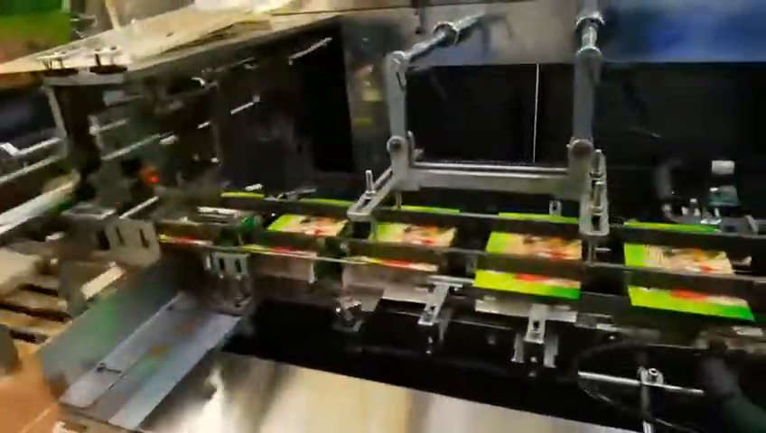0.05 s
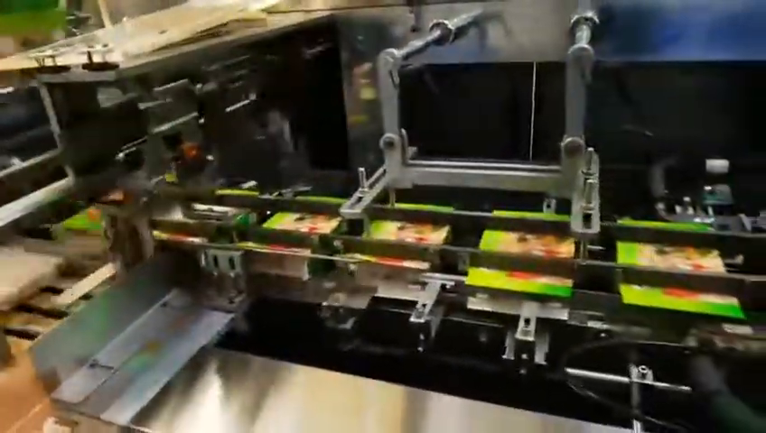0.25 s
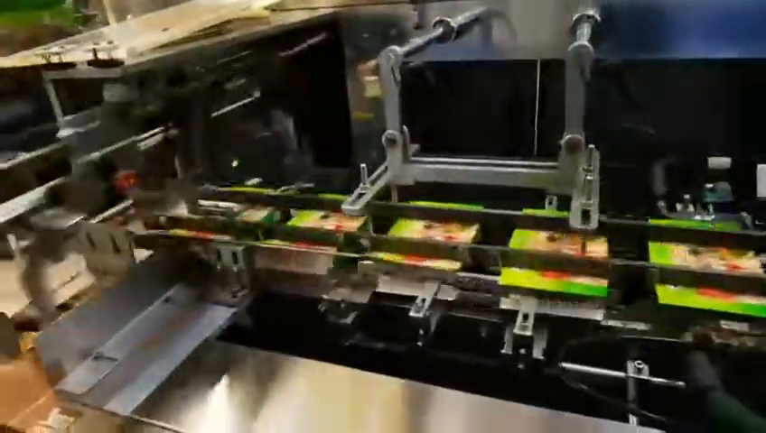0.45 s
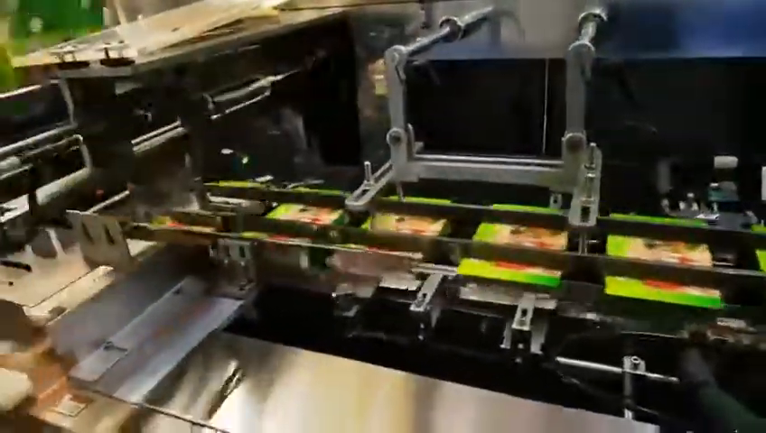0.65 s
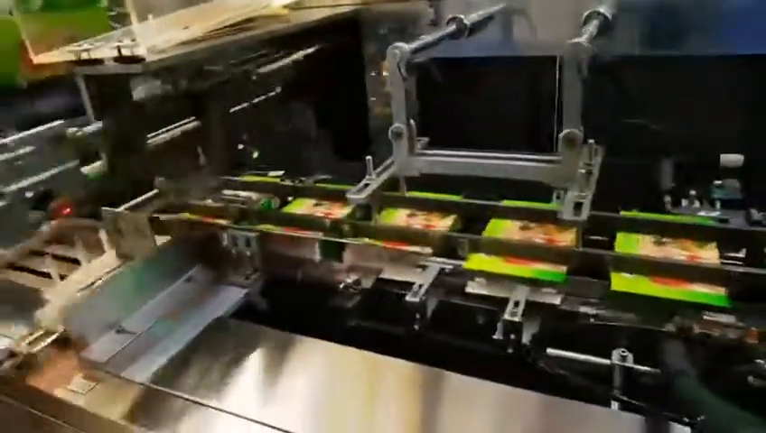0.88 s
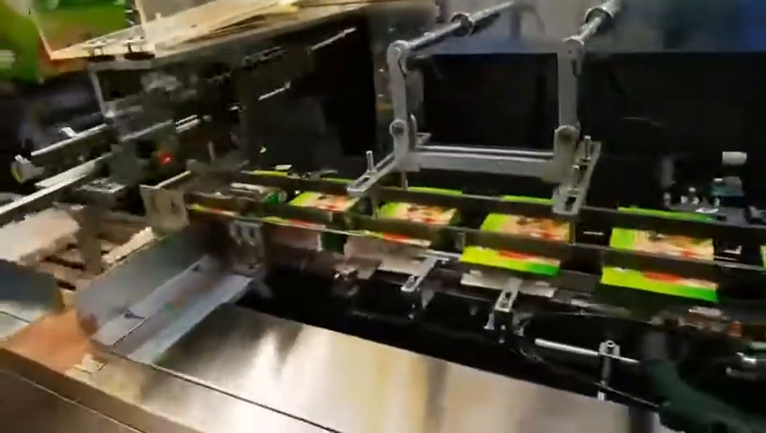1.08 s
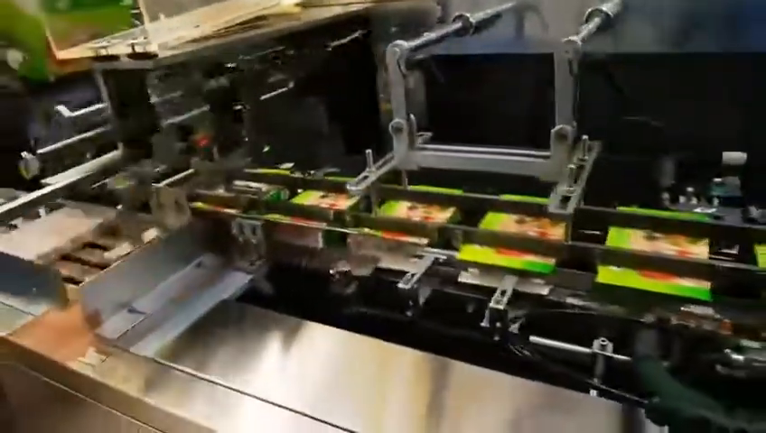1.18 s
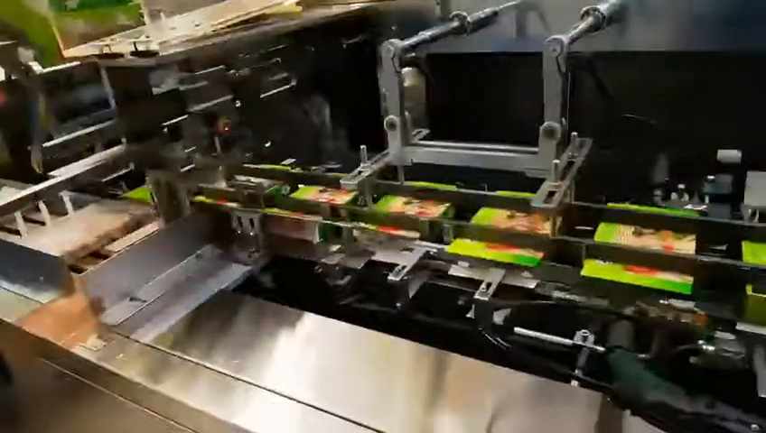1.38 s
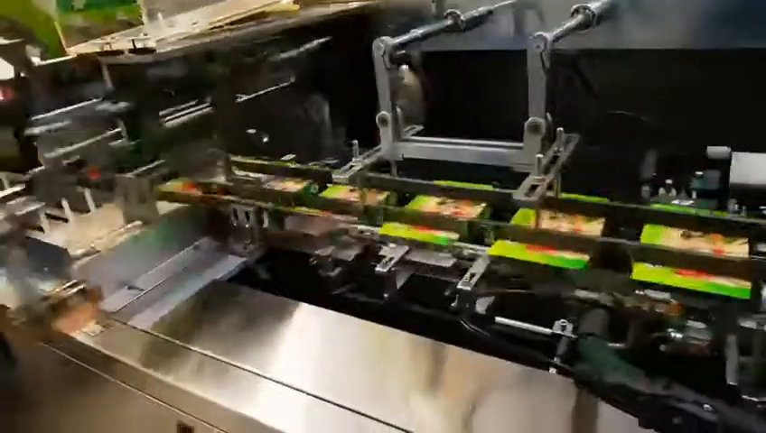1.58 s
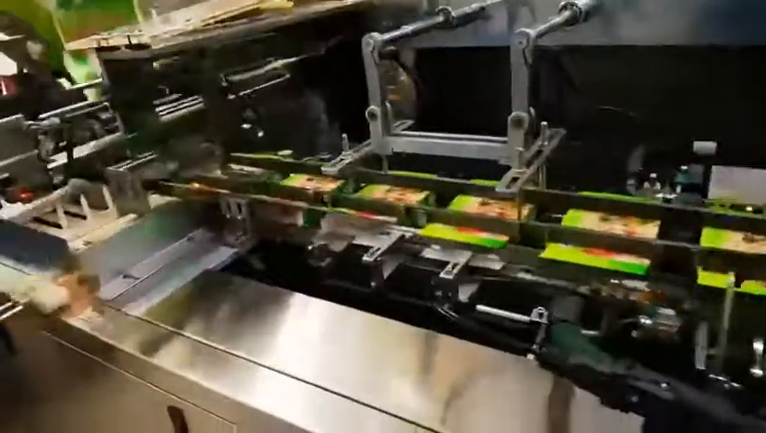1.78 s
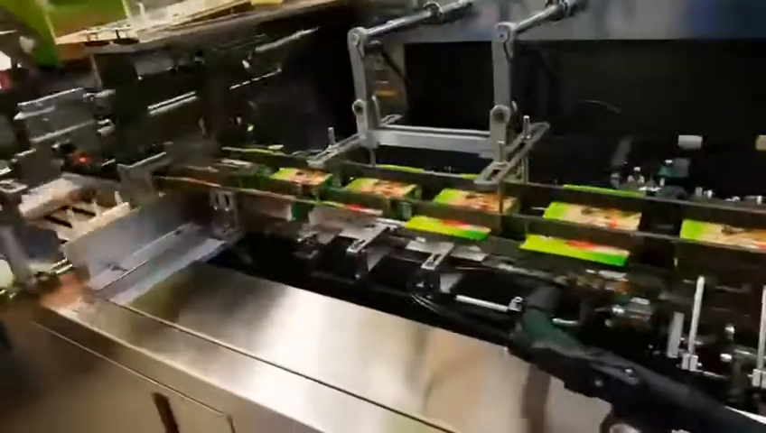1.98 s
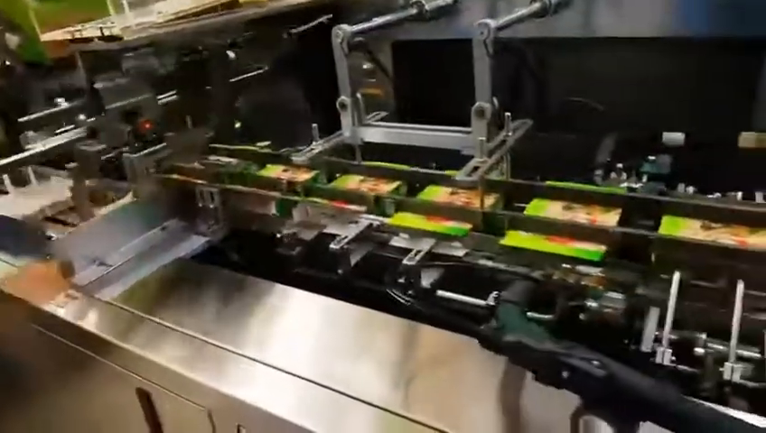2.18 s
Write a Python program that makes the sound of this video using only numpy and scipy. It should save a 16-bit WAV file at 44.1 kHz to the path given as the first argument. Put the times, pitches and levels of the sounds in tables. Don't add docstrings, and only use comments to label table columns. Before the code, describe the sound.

A carton packing machine clatters steadily, with one sharp whistling hiss of vented air near the start

```python
import sys
import numpy as np
from scipy import signal
from scipy.fft import rfft, irfft, next_fast_len
from scipy.io import wavfile
from scipy.ndimage import uniform_filter1d, map_coordinates

SR = 44100
rng = np.random.default_rng(int(sys.argv[2]) if len(sys.argv) > 2 else 0)


def undo_db(level):
    steps = np.asarray(level, float) / 20
    return 10 ** steps


def wav_out(sig):
    wavfile.write(sys.argv[1], SR, np.round(np.clip(np.atleast_2d(sig).T, -1, 1) * 32767).astype(np.int16))


N = 99225


def unit(x):
    return x / np.sqrt(np.mean(x ** 2) + 1e-20)


def along(points, hz):
    f, v = np.transpose(points)
    return np.interp(np.log(hz + 1), np.log(f + 1), v, left=-120)


def curves(rows):
    s, *columns = np.transpose(rows)
    return [np.interp(np.arange(N) / SR, s, c) for c in columns]


def wobble(rate):
    return map_coordinates(rng.standard_normal(400), [np.arange(N) * rate / SR])


def filtered(x, response):
    m = next_fast_len(len(x) + 8192)
    return irfft(rfft(x, m) * response(np.fft.rfftfreq(m, 1 / SR)), m)[:len(x)]


def body(peaks):
    def response(f):
        total = 0
        for k, (hz, width, db) in enumerate(peaks):
            loss = 1j * f * width
            total = total + (-1) ** k * undo_db(db) * loss / (hz * hz - f * f + loss)
        return total
    return response


def rush(tone, patchy_db, shape=lambda hz, t: 0):
    hz, t, z = signal.stft(rng.standard_normal(N), SR, nperseg=512)
    patches = uniform_filter1d(rng.standard_normal(z.shape), size=6, axis=0)
    patches = uniform_filter1d(patches, size=8, axis=1)
    z = z * undo_db(patchy_db * unit(patches) + shape(hz[:, None], t))
    x = signal.istft(z, nperseg=512)[1][:N]
    return filtered(x, lambda f: undo_db(along(tone, f)))


def hits(rows, broad, q, rise_s, snap_db):
    out, t = np.zeros(N + SR), np.arange(SR // 5) / SR
    for s, db, hz, t60, broad_db in rows:
        a, b = rng.standard_normal((2, len(t)))
        fade = undo_db(-60 * t / t60) * (1 - np.exp(-t / rise_s))
        ring = unit(filtered(a, body([(hz, hz / q, 0)])))
        own = unit(ring + 0.85 * np.sin(2 * np.pi * hz * t))
        b = b + undo_db(snap_db) * (np.arange(len(t)) == round(.002 * SR))
        blow = fade * (own + undo_db(broad_db) * unit(filtered(b, broad)))
        out[round(s * SR):][:len(t)] += undo_db(db - 2.0) * blow / np.abs(blow).max()
    return out[:N]


def narrow_notes(rows, q):
    t, out = np.arange(N) / SR, np.zeros(N)
    for s, length, db, hz, hiss_db in rows:
        a, b = rng.standard_normal((2, N))
        gate = np.clip((t - s) / 0.0071, 0, 1) * undo_db(-350 * np.clip(t - s - length, 0, 9))
        note = unit(filtered(a, body([(hz, hz / q, 0)])))
        note = note / np.sqrt(np.abs(uniform_filter1d(note ** 2, size=2000)) + 0.27)
        hiss = unit(filtered(b, body([(hz * 1.1, 6000, 0)])))
        out += undo_db(db) * gate * (note + undo_db(hiss_db) * hiss)
    return out


# (time [s], level [dB])
HALL_LEVEL = [(0, -37.5), (.06, -37.5), (.16, -41.5), (.3, -48.5), (.56, -37.5), (.8, -37.5), (.86, -33),
              (.945, -40.5), (1.0, -37), (1.25, -41.5), (1.4, -35.5), (1.52, -38.5), (1.62, -33.5),
              (1.77, -40), (1.83, -39), (1.89, -40), (2.04, -38), (2.25, -40)]
# (frequency [Hz], density [dB per Hz])
HALL_TONE = [(240, -39), (400, -7), (580, -10.5), (644, -1.5), (867, -7.5), (934, -1.5), (2980, -8.5),
             (7840, -8.5), (11000, -12.5), (14000, -21)]
# (time [s], level [dB])
RUMBLE_LEVEL = [(0, -50), (.08, -47), (.17, -43), (.25, -40), (.32, -46.5), (.42, -54), (.56, -45),
                (.74, -34.5), (.92, -51.5), (1.05, -49.5), (1.2, -45), (1.42, -34.5), (1.63, -43),
                (1.95, -41.5), (2.05, -44), (2.14, -45.5), (2.25, -50)]
# (frequency [Hz], density [dB per Hz])
RUMBLE_TONE = [(13, -54), (22, 2.5), (91, 10.5), (257, 0), (300, -10.5), (390, -1), (660, -120)]


def hall():
    roar_db = curves(HALL_LEVEL)[0] - 0.73 + 0.81 * wobble(14.45)
    roar = undo_db(roar_db) * unit(rush(HALL_TONE, patchy_db=2.5))
    hum_hz, hum_db = 100, -13
    phase = 2 * np.pi * hum_hz * np.arange(N) / SR
    hum = undo_db(hum_db + 4 * wobble(16)) * np.sin(phase + .6 * wobble(7))
    rumble = unit(rush(list(RUMBLE_TONE) + [(420, -73)], patchy_db=0.5))
    return roar + undo_db(curves(RUMBLE_LEVEL)[0] - 1.0) * (rumble + hum)


# (time [s], peak [dB], pitch [Hz])
THUDS = [
    (0.063, -34, 107),
    (0.239, -37, 91.5),
    (0.553, -40, 180),
    (0.717, -47, 80.5),
    (1.043, -30.5, 96.9),
    (1.138, -33.5, 103),
    (1.514, -27, 91),
    (1.62, -36, 82.4),
    (1.829, -34.5, 130),
    (2.113, -37, 96),
]


def thuds():
    rows = [(*thud, 0.19, -20) for thud in THUDS]
    return hits(rows, body(FRAME), q=5.3, rise_s=0.0047, snap_db=-33)


# (time [s], length [s], level [dB], pitch [Hz], hiss [dB])
SINGING = [(.2, 0.036, -52, 922, -30), (.52, 0.023, -34.5, 928, -35), (1.12, 0.044, -39.5, 933, -26),
           (1.27, 0.096, -42.5, 473, -36), (1.29, 0.071, -40, 825, -30), (1.4, 0.048, -38.5, 885, -28),
           (1.4, 0.023, -42, 627, -28), (1.79, 0.029, -35.5, 472, -30), (1.83, .07, -39, 922, -34),
           (1.86, 0.085, -41, 620, -30), (2.1, 0.053, -44, 102, -30)]


def singing():
    return narrow_notes(SINGING, q=120)


# (time [s], length [s], level [dB], pitch [Hz], hiss [dB])
LEAKS = [
    (0.496, 0.18, -40, 3200, -21),
    (1.311, .1, -40.5, 6320, -1),
    (1.537, 0.15, -49, 6700, -7),
    (2.114, 0.15, -46.5, 3710, -19),
]


def leaks():
    return narrow_notes(LEAKS, q=26)


# (time [s], level [dB], rail brightness [dB])
DRIVE = [(0, -55, 15.5), (.05, -47.5, 9), (.16, -43, -9), (.24, -27, -15.5), (.29, -41, -13.5),
         (.46, -54, 15.5), (.53, -29, -1.5), (.69, -30.5, -5), (.83, -27, -13.5), (.9, -56, -9),
         (1.08, -40, -1), (1.13, -40.5, 4), (1.22, -39, -6.5), (1.4, -29.5, -16), (1.75, -36.5, -15),
         (1.81, -29, -11.5), (1.96, -35, -22), (2.01, -47, -14)]
# (frequency [Hz], width [Hz], level [dB])
FRAME = [(284, 300, -3), (480.6, 99, 7), (609, 81, 5.5), (860, 36, 8), (930.5, 48.5, 7), (1120, 208, 0.5),
         (1592, 37, -1.5)]
# (frequency [Hz], width [Hz], level [dB])
RAILS = [(1940, 135, 2.5), (2710, 240, 3), (3200, 120, 3), (3510, 64, 5), (4960, 940, -9)]


def drive():
    links_per_s, spread_db = 430, -2
    level_db, bright_db = curves(DRIVE)
    draw = rng.random((2, 2, N))
    links = (draw[0] < links_per_s / SR) * undo_db(-spread_db * np.log(draw[1] + 0.003))
    shake = [unit(v) + 1.6 * rng.standard_normal(N) for v in links]
    frame = unit(filtered(shake[0], body(FRAME)))
    rails = unit(filtered(shake[1], body(RAILS)))
    return undo_db(level_db - 5.5 + 0.32 * wobble(25.7)) * (frame + undo_db(bright_db) * rails)


# (time [s], peak [dB], pitch [Hz])
KNOCKS = [(0.213, -24.5, 923), (0.235, -27.5, 910), (0.329, -25.5, 453), (0.496, -30, 1030),
          (0.549, -20.5, 974), (0.653, -21.5, 550), (0.723, -17, 574), (0.7247, -23, 1210),
          (1.104, -23, 994), (1.154, -25, 930), (1.289, -26, 816), (1.395, -20.5, 877), (1.398, -15.5, 482),
          (1.463, -20, 450), (1.511, -25, 860), (1.572, -23.5, 1016), (1.599, -19, 880), (1.633, -18, 1080),
          (1.696, -24, 413), (1.733, -22, 995), (1.769, -22.5, 916), (1.799, -20, 853), (1.839, -30, 910),
          (1.885, -28, 630), (1.919, -27.5, 626), (2.175, -24.5, 1130), (2.192, -22, 1115)]


def knocks():
    rows = [(*knock, 0.11, -3) for knock in KNOCKS]
    return hits(rows, body(FRAME), q=2.37, rise_s=0.00091, snap_db=-33)


# (time [s], peak [dB], pitch [Hz], t60 [s], broad crack [dB])
CLICKS = [(0.0217, -27.5, 2270, 0.2, -19), (0.2312, -24, 7460, 0.11, 6), (0.7095, -22.5, 3200, 0.16, -7),
          (.7255, -25, 2120, 0.058, -18), (.8066, -28, 2130, 0.069, 6), (1.0002, -28.5, 1580, 0.1, 7),
          (1.1038, -28.5, 1742, 0.33, 2), (1.1296, -34, 2655, 0.15, -5), (1.3922, -20, 3630, 0.066, -16.5),
          (1.5671, -21, 6950, 0.12, 7), (1.5831, -21.5, 1545, 0.069, -1), (1.708, -21.5, 1990, 0.046, 0.5),
          (1.7686, -27, 2490, 0.078, -10), (1.8178, -26.5, 3330, 0.047, -10), (1.9195, -28, 1524, 0.14, 0),
          (1.9494, -22.5, 3520, 0.13, 15), (2.04, -31, 4270, 0.082, -11), (2.1301, -28, 3750, 0.056, -15),
          (2.1784, -27.5, 1527, 0.23, -6)]
# (frequency [Hz], density [dB per Hz])
CLICK_TONE = [(350, -64), (600, -1), (2140, 5), (2650, 3), (3740, 6), (6870, -0.5), (10900, -1.5),
              (14200, -110)]


def crack(f):
    return undo_db(along(CLICK_TONE, f))


def clicks():
    return hits(CLICKS, crack, q=8, rise_s=.004, snap_db=-30)


# (time [s], peak [dB], pitch [Hz], t60 [s], broad crack [dB])
SNAPS = [
    (.8403, -12.5, 6900, 0.056, -4),
    (.8432, -9, 5580, 0.051, 1),
    (.9585, -19, 2930, 0.04, -9),
    (.9605, -11, 1650, 0.12, 5),
    (2.0152, -13.5, 5240, 0.15, 5),
    (2.1784, -27, 1060, 0.038, -8),
]


def snaps():
    return hits(SNAPS, crack, q=6, rise_s=.0012, snap_db=22)


def walls(x):
    t60_s, level_db = 0.11, -13
    t = np.arange(SR // 2) / SR
    tail = rng.standard_normal(len(t)) * undo_db(-60 * t / t60_s) * (t > .006)
    return undo_db(level_db) * signal.fftconvolve(x, tail / np.linalg.norm(tail))[:N]


# (frequency [Hz], wander [knots per s], level [dB])
PIPE = [(6600, 30, -8), (7300, 32, -20), (7170, 30.3, -5), (7250, 43, -2), (7548, 34, -11)]


def whistle():
    peak_s, level_db, rise_s, t60_s = .281, -18, .009, .13
    t = np.arange(N) / SR - peak_s
    notes = 0
    for hz, wander, db in PIPE:
        loudness = undo_db(db + 3 * wobble(wander))
        notes = notes + loudness * np.sin(2 * np.pi * hz * t + 1.4 * wobble(wander))
    swell = np.where(t < 0, np.exp(np.minimum(t, 0) / rise_s), undo_db(-60 * np.abs(t) / t60_s))
    return undo_db(level_db) * unit(notes) * swell * (t > VENT[0][0] - peak_s)


# (time [s], pressure [dB], nozzle fizz [dB])
VENT = [
    (0.255, -45, -5),
    (.258, -23, -35),
    (0.278, -17.5, -36),
    (.3, -19.5, -10.5),
    (.34, -22, -10.5),
    (.46, -25.5, -11),
    (0.599, -28, -4),
    (.68, -35.5, -2),
    (.8, -49, -6),
]
# (frequency [Hz], density [dB per Hz])
VENT_TONE = [(2500, 10), (4300, -7), (5500, -4.5), (6200, 0.5), (7000, 2), (7520, 3.5), (7640, -4),
             (7950, -22)]
# (frequency [Hz], density [dB per Hz])
FIZZ_TONE = [(7300, -45), (7650, 4.5), (8400, 0.5), (9300, 1), (11000, -0.5), (12000, -11), (14000, -5)]


def vent():
    start, end = VENT[0][0], VENT[-1][0]
    edge_start_hz, edge_end_hz, edge_fall_s, edge_db_per_octave = 7200, 4390, 0.016, 42

    def edge_shape(hz, t):
        fall = np.exp(-np.clip(t - start - .027, 0, 9) / edge_fall_s)
        edge_hz = edge_end_hz + (edge_start_hz - edge_end_hz) * fall
        return edge_db_per_octave * np.clip(np.log2((hz + 1) / edge_hz), -1, 0)

    air = rush(VENT_TONE, 1.4, edge_shape)
    air = air / np.sqrt(np.abs(uniform_filter1d(air ** 2, size=1500)) + 1e-12)
    pressure_db, fizz_db = curves(VENT)
    air = air + undo_db(fizz_db) * unit(rush(FIZZ_TONE, patchy_db=3.5))
    t = np.arange(N) / SR
    opening = np.clip((t - start) / 0.0052, 0, 1)
    closing = np.clip((end - t) / 0.042, 0, 1)
    return undo_db(pressure_db - 2.96) * air * opening * closing


def scene():
    blows = knocks() + clicks() + snaps()
    background = hall() + thuds() + singing() + leaks()
    return (background + drive() + blows + walls(blows) + whistle() + vent())[None]


# (frequency [Hz], threshold against the neighbourhood [dB])
MUTE = [(300, -12), (2000, -4.5), (8000, -4), (10500, -3), (11500, -1.3), (13300, -.5), (14250, 3.5)]


def muted(x, size, spells, calm_db):
    hz, t, z = signal.stft(x, SR, nperseg=size)
    near = uniform_filter1d(uniform_filter1d(np.abs(z) ** 2, size=4, axis=0), size=2, axis=1)
    near_db = 10 * np.log10(np.abs(near) + 1e-20)
    wide_db = uniform_filter1d(uniform_filter1d(near_db, size=size // 30 + 4, axis=0), size=3, axis=1)
    rise_db = calm_db
    for s, length, db in spells:
        rise_db = rise_db + ((t > s) & (t < s + length)) * (db - calm_db)
    hz = hz[:, None]
    rise_db = rise_db * ((hz > 1500) & ((hz < 6500) | (calm_db < 0)))
    heard = near_db > wide_db + along(MUTE, hz) + rise_db
    keep = np.where(heard, 1, .03) * (hz < 14250)
    return signal.istft(z * keep, nperseg=size)[1][:N]


def top_cut(x):
    return signal.sosfilt(signal.butter(12, 14390, fs=SR, output="sos"), x)


# (time [s], length [s], threshold rise [dB])
BUSY = [(.285, .17, 2), (.6, .03, 2), (1.09, .03, 2), (1.2, .04, 2), (1.35, .04, 2.5), (1.48, .06, 2.5),
        (1.77, .03, 2.5), (1.87, .05, 2.5), (2.01, .03, 2)]
# (time [s], length [s], threshold rise [dB])
THINNED = [
    (.259, .021, 3),
    (.941, .017, 3),
]


def record(dry):
    low_hz = 41.3
    x = filtered(dry[0], lambda f: (1j * f / (low_hz + 1j * f)) ** 2)
    x = muted(x, size=1536, spells=BUSY, calm_db=0)
    x = muted(x, size=256, spells=THINNED, calm_db=-60)
    return top_cut(x[None])


dry = scene()
out = record(dry)
wav_out(out)
```